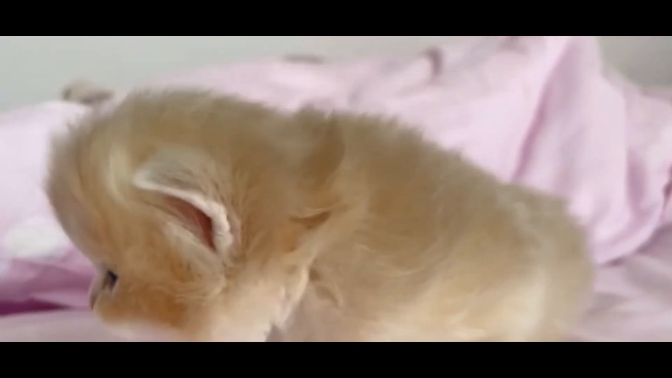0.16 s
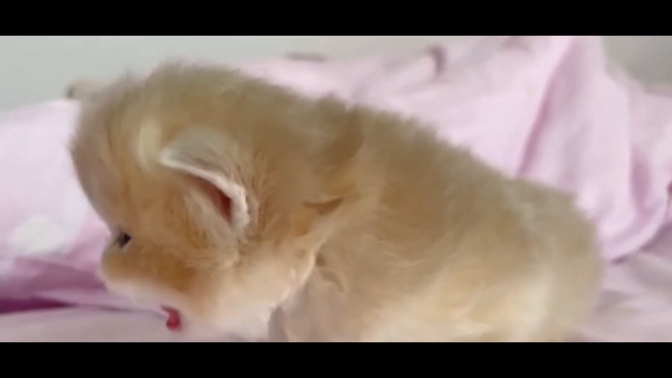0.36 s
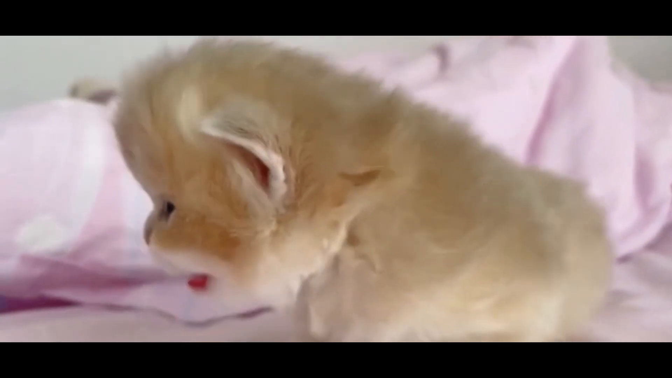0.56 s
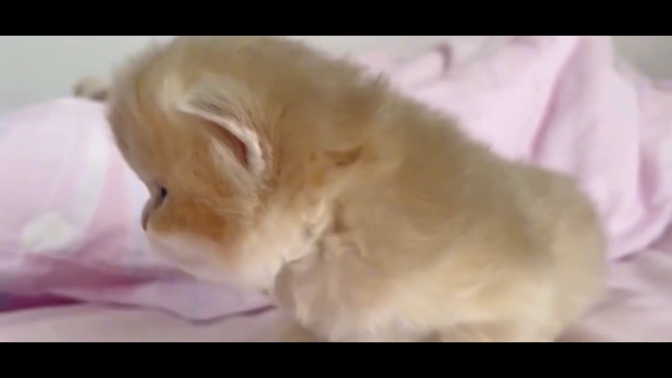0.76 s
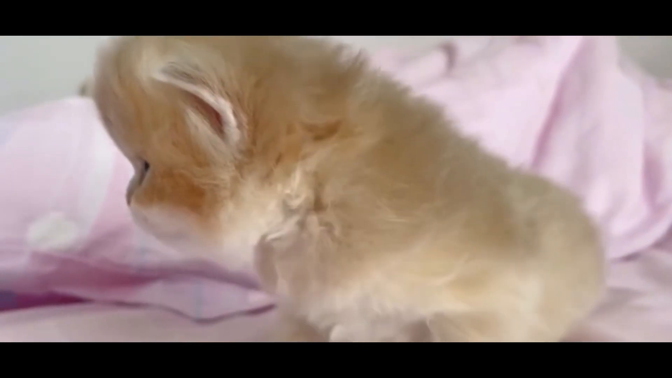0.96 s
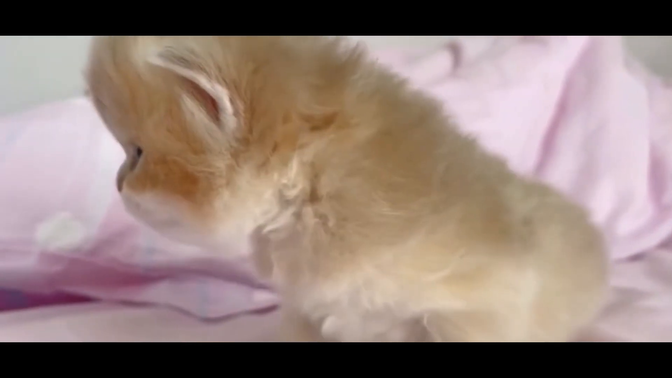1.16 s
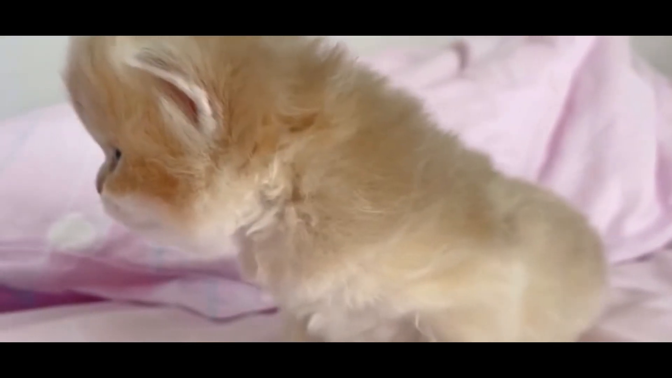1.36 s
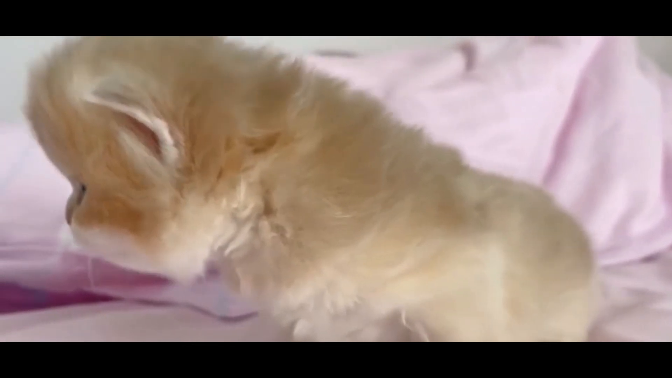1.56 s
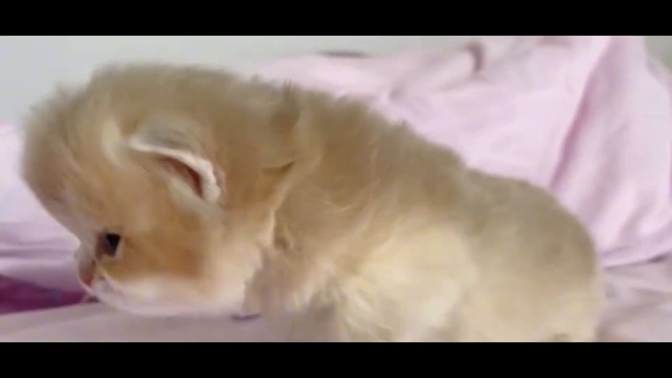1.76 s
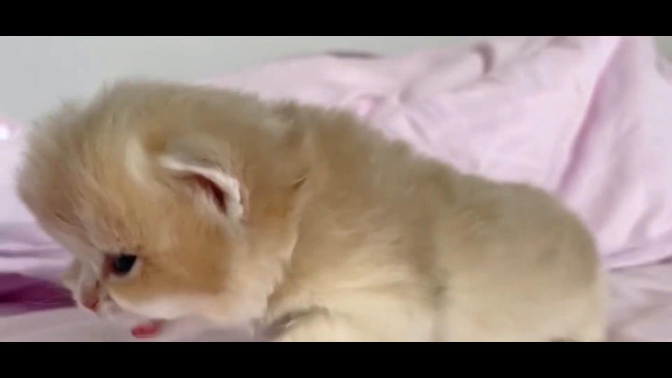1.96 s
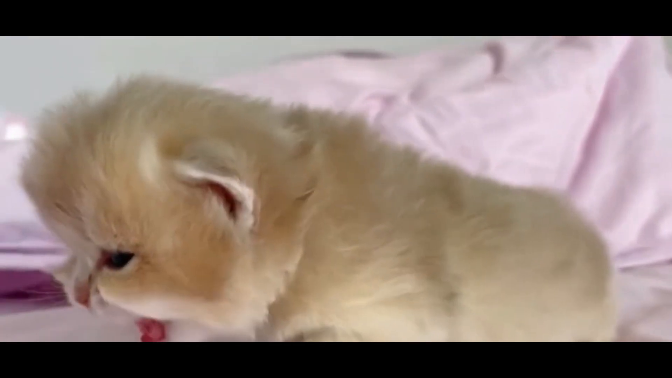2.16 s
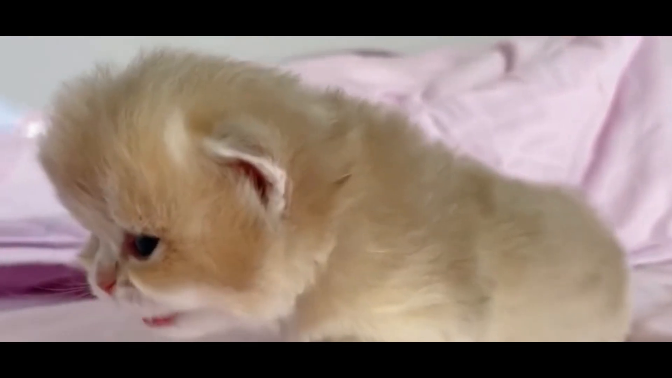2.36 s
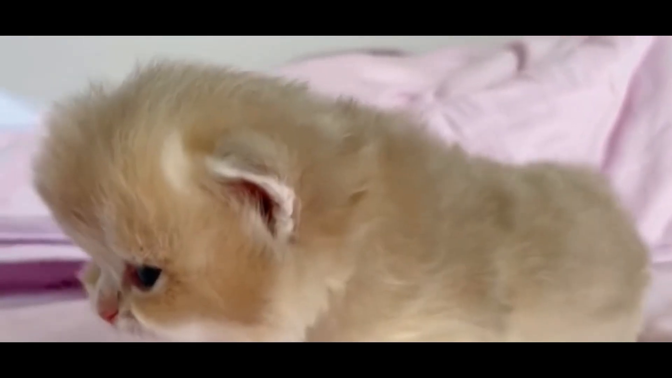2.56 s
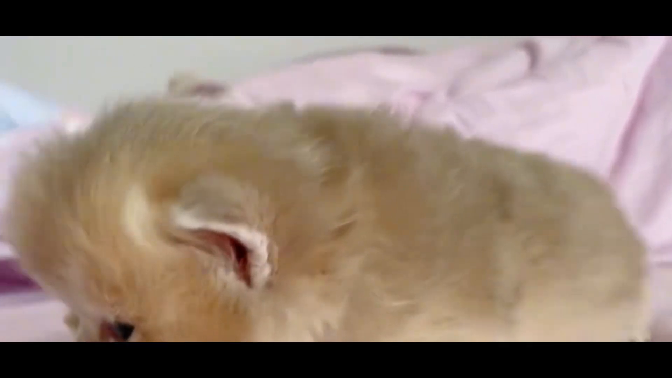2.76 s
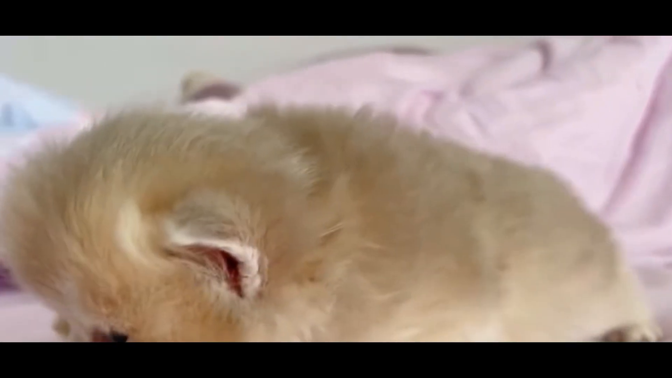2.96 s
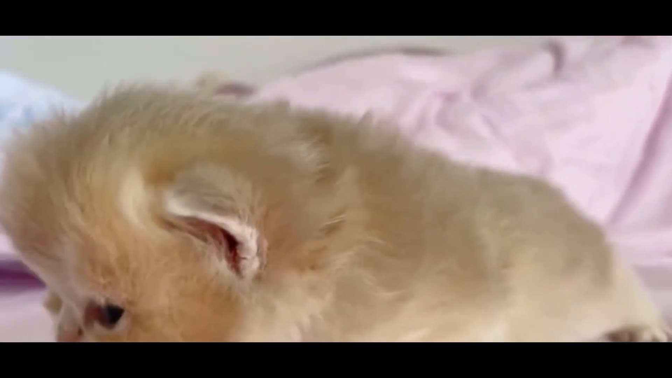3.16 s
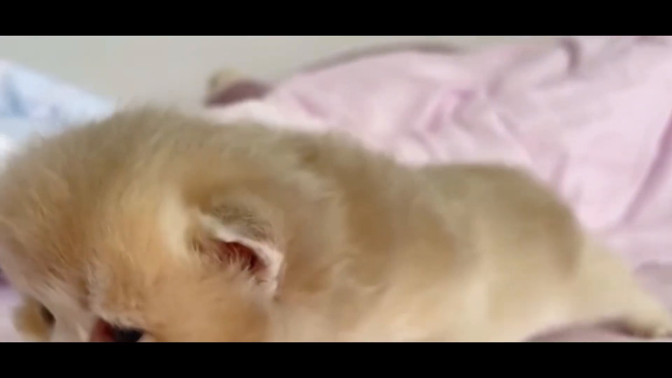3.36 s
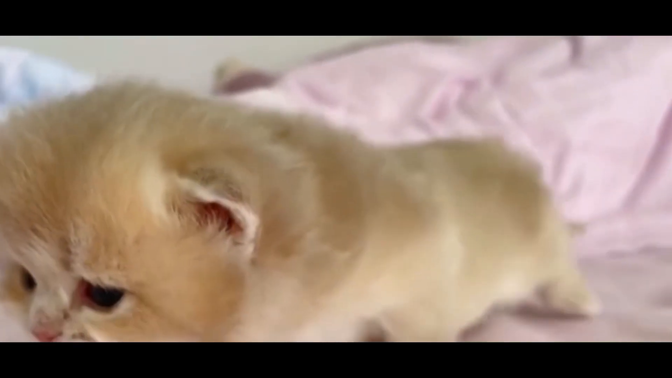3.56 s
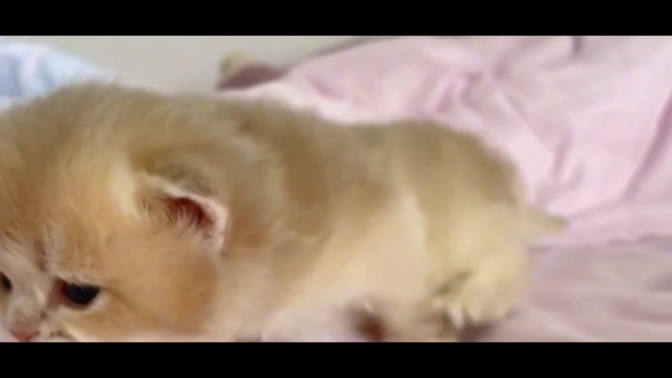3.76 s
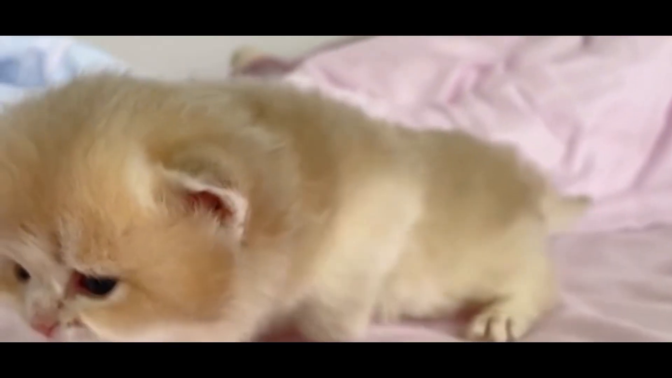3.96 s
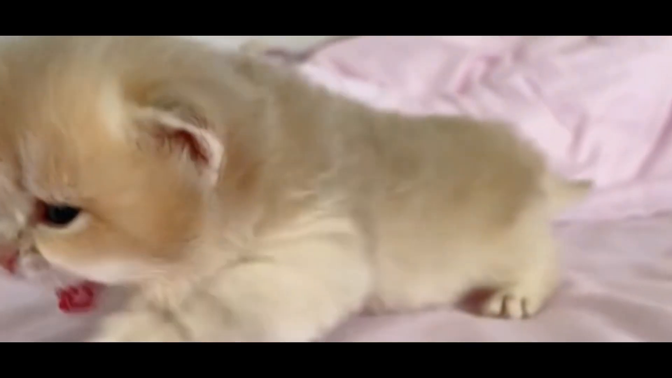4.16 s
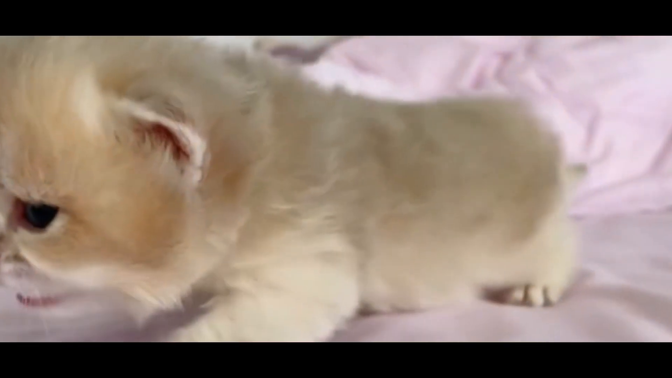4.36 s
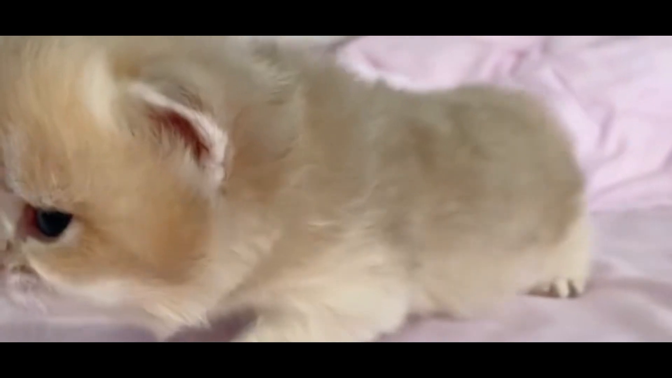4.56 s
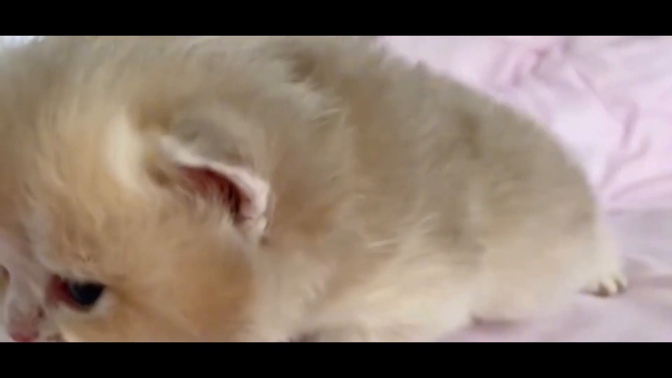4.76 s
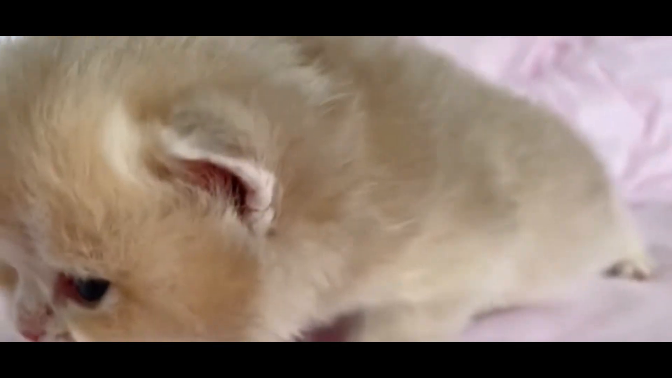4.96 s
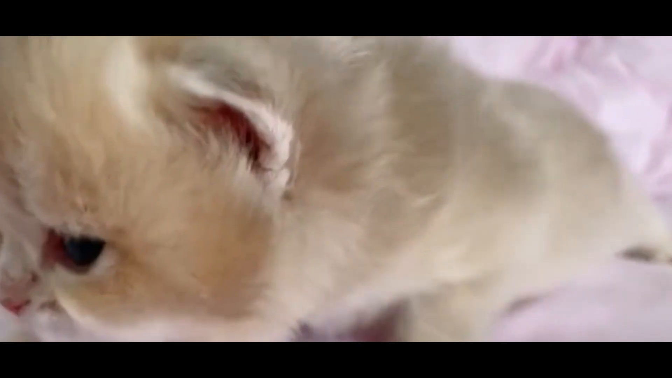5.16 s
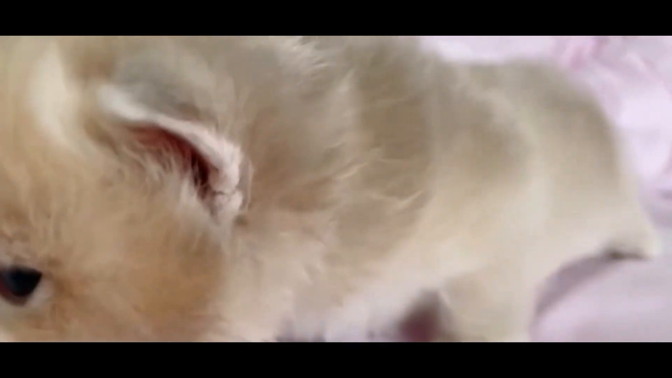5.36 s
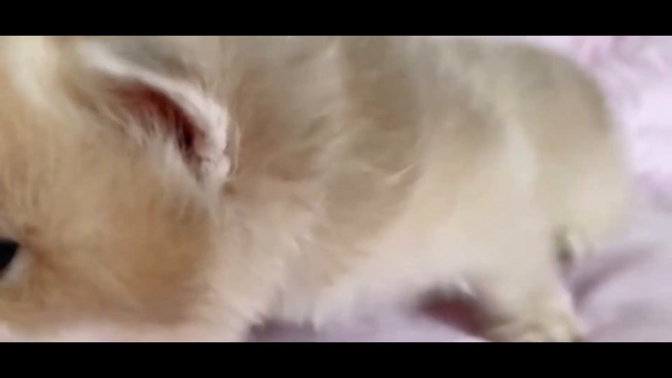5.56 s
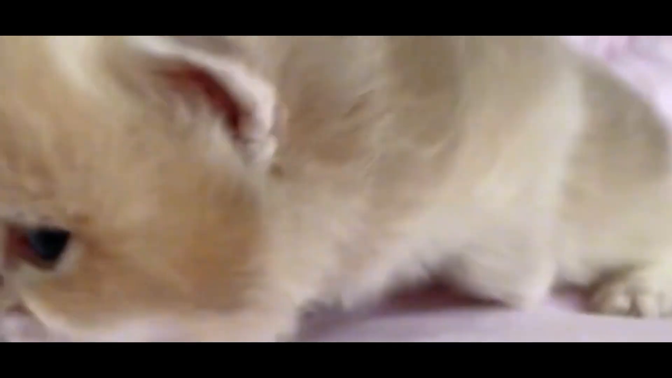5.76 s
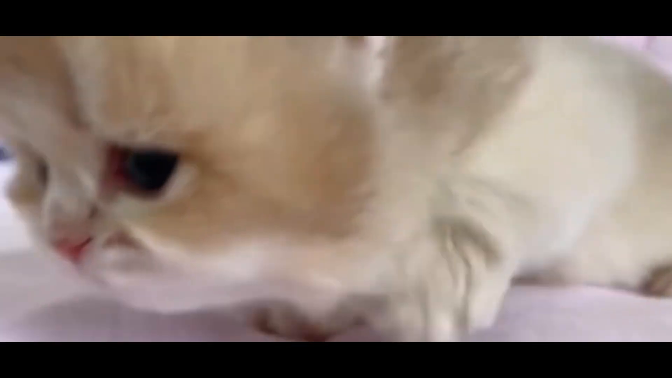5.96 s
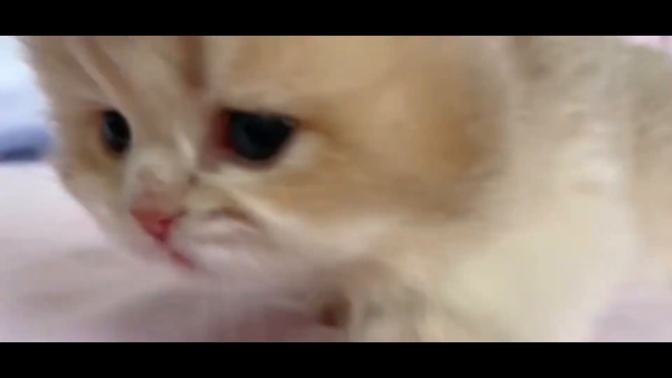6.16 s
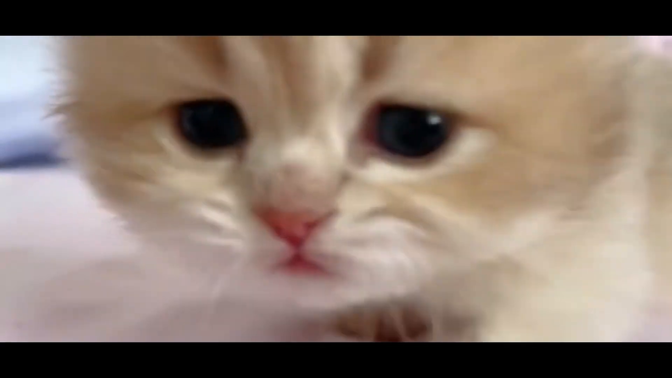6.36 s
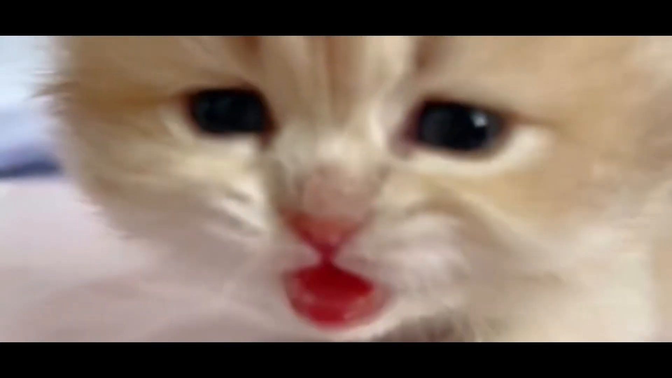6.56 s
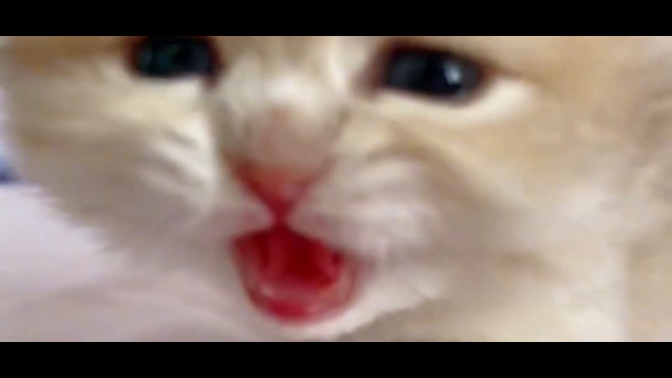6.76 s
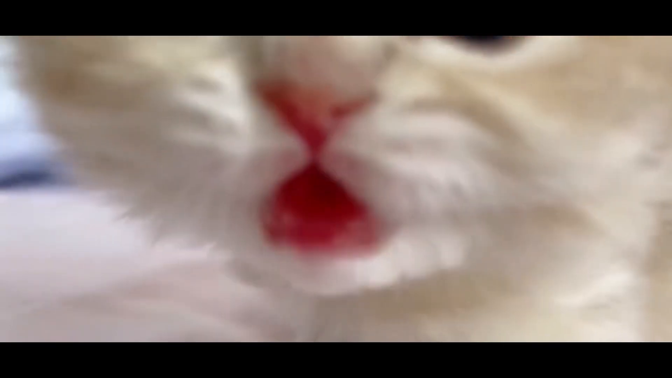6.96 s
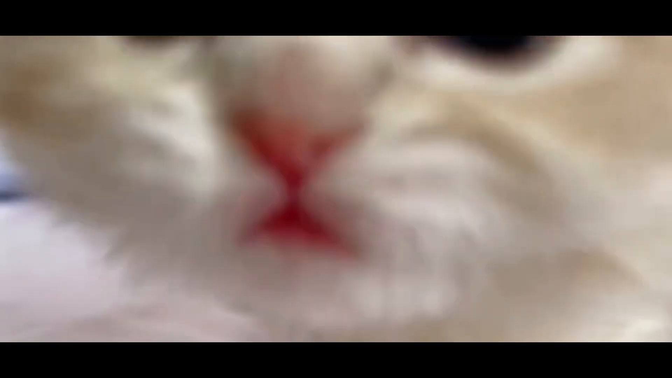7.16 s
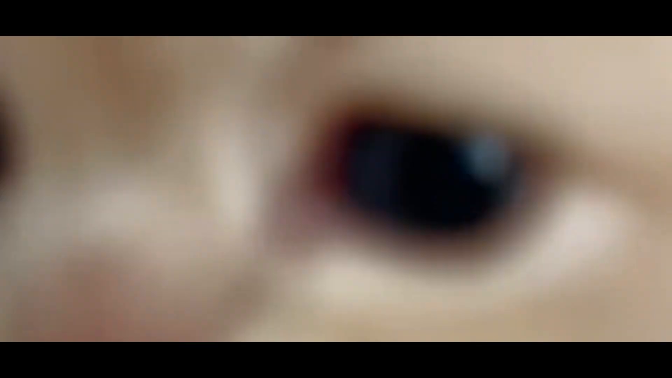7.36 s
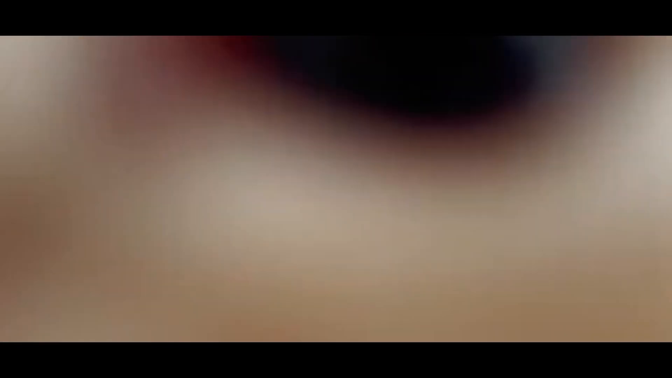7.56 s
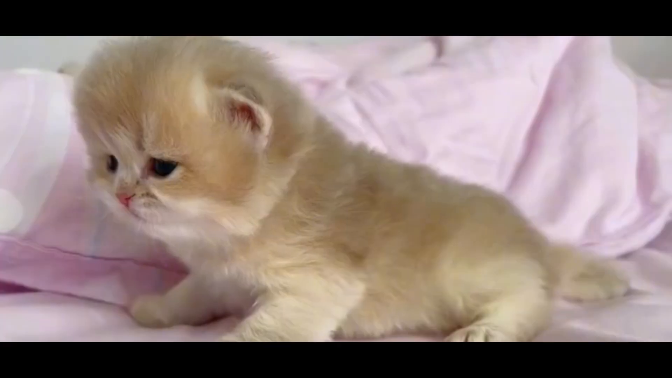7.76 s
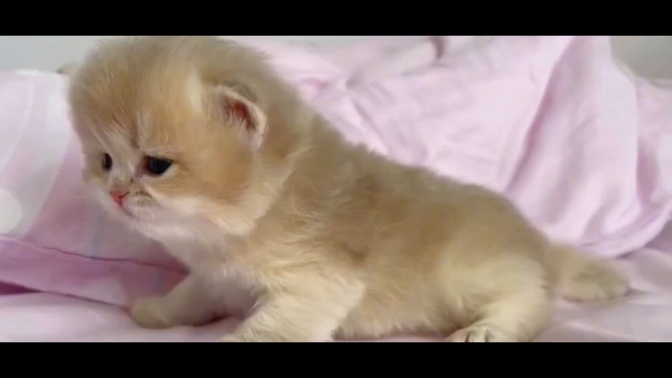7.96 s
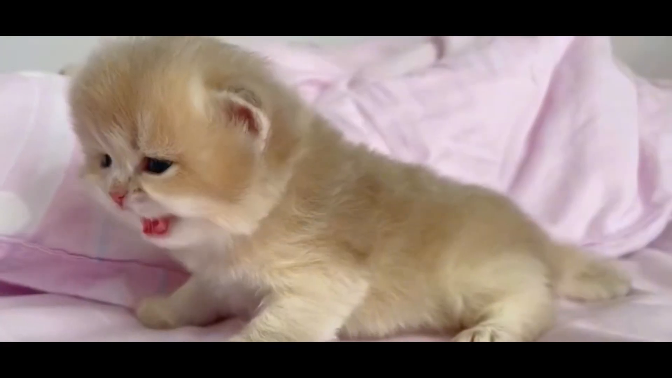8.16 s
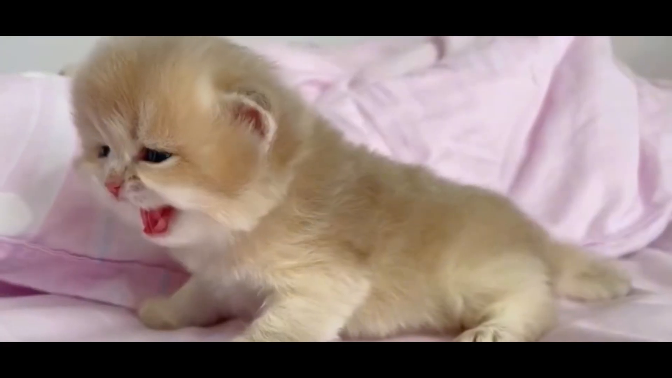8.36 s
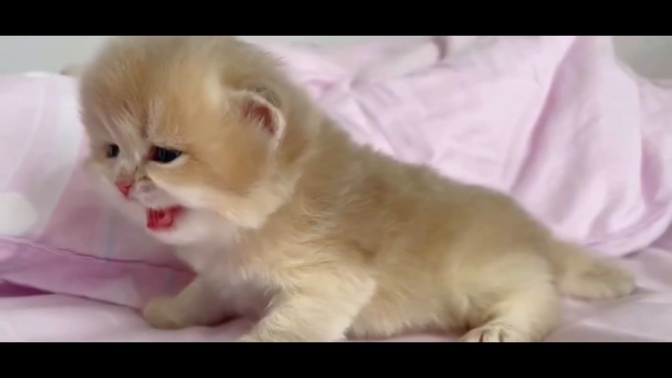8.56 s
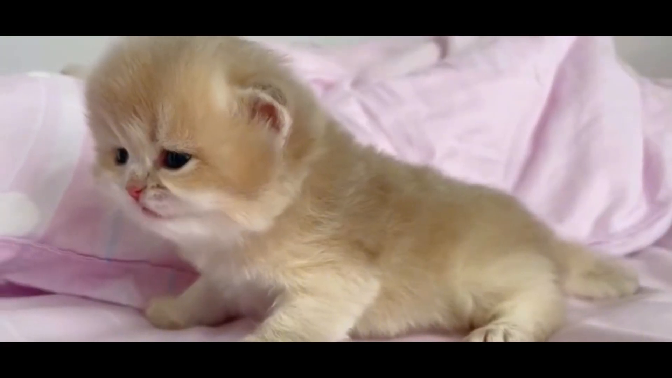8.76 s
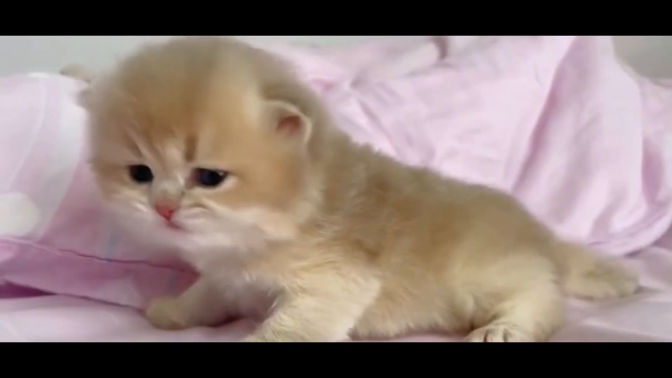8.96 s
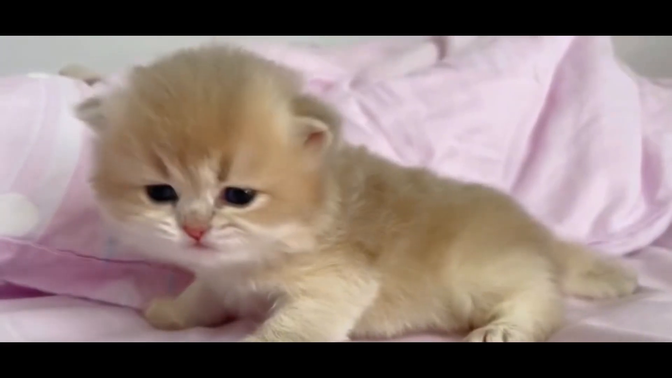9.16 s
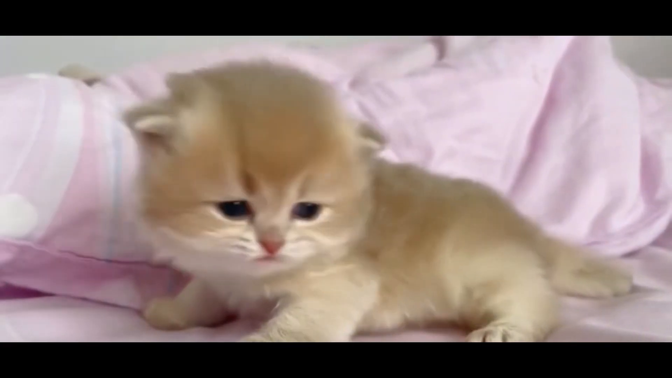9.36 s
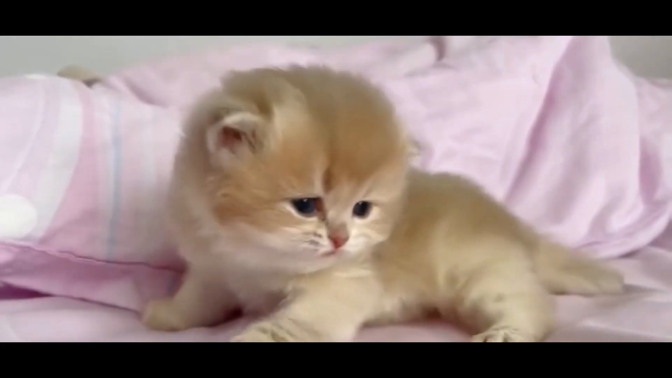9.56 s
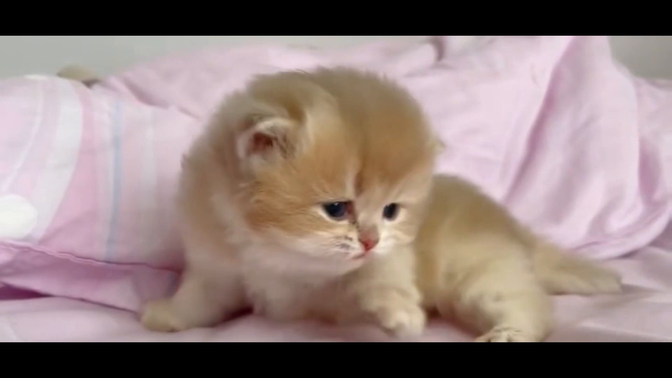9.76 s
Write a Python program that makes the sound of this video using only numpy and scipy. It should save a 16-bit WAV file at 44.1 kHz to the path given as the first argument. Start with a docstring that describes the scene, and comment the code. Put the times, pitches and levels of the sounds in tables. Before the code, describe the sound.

Quiet indoor bed, close small microphone with little deep bass. Piercing, short kitten mews rise, break and fall away, spaced about two seconds apart. Between them come soft rumble, rustle and hiss of cloth, muffled paw pats and grainy scuffs, busiest between five and six seconds. Distant littermates mew weakly early and before the fourth cry. A tiny dropout precedes the final mew, then it calms.

```python
"""A tiny kitten mews at 0, 1.8, 3.7, 6.3 and 8 s: harmonic stacks that break in pitch, with puffs of air.
Litter mates call faintly in the first 1.3 s and again from 5.5 to 6.7 s, as four shaky partials in a room.
Throughout, knocks and ticks of paws and claws, and grainy scuffs, lie over rumble, rustle and hiss of the bed.
Just after 7.5 s everything falls silent for about an eighth of a second."""
import sys
import numpy as np
from scipy import signal
from scipy.io import wavfile
from scipy.ndimage import uniform_filter1d

SR = 44100
rng = np.random.default_rng(int(sys.argv[2]) if len(sys.argv) > 2 else 0)


def unload_audio(sound):
    """Save the sound as a 16-bit wav file, at the path given as the first command line argument."""
    columns = np.transpose(np.atleast_2d(sound))
    # keep every value between -1 and 1, then stretch to whole-number steps
    steps = np.round(np.clip(columns, -1, 1) * 32767)
    wavfile.write(sys.argv[1], SR, steps.astype(np.int16))


N = 433503

# The voice through each mew, one table a mew; two close rows are a voice break.
# Each row: time in seconds, pitch in Hz, effort in dB, brightness in dB per partial.
MEWS = [
    [(0, 1396, -52.5, 3.5), (0.018, 1597, -43, 5), (0.048, 1754, -37, 2.5), (0.066, 1995, -28, -7.5),
     (0.098, 2230, -24, -7), (0.176, 2353, -12, -17), (0.264, 2173, -8, -29.5), (0.268, 2476, -17.5, -22.5),
     (0.305, 2470, -28.5, -17), (0.345, 2305, -38, -13), (0.375, 2354, -41, -23),
     (0.414, 2300, -40.5, -23.5), (0.48, 1980, -38, -26), (0.516, 1723, -34, -16), (0.52, 1207, -46, -5.5),
     (0.562, 830, -55.5, 3)],
    [(1.778, 1080, -46, -10), (1.787, 1136, -38, -6), (1.808, 1510, -43.5, 5), (1.858, 1833, -26.5, -2.5),
     (1.897, 2179, -19.5, -9.5), (1.928, 2205, -15.5, -18.5), (1.931, 2420, -10, -21.5),
     (1.973, 2347, -3.5, -27.5), (2.01, 2085, -7, -29), (2.037, 1969, -9.5, -32), (2.04, 2270, -15.5, -19),
     (2.08, 2174, -28, -20), (2.146, 2223, -35, -30), (2.296, 1764, -43.5, -38), (2.37, 1580, -37.5, -35),
     (2.388, 1528, -36, -17), (2.41, 1323, -39, -11.5), (2.454, 960, -44, -2.5)],
    [(3.733, 1117, -48.5, 0.5), (3.757, 1580, -38.5, -3), (3.768, 1780, -33, -9.5), (3.777, 1898, -22, -13),
     (3.812, 2170, -23, -8), (3.815, 1923, -23, -4.5), (3.855, 2104, -23, -8), (3.858, 2343, -19.5, -8.5),
     (3.924, 2390, -12.5, -20), (3.948, 2184, -9.5, -30.5), (3.972, 2121, -5, -25.5),
     (4.008, 2143, -19.5, -22), (4.011, 2228, -28.5, -19), (4.073, 2167, -26, -27),
     (4.115, 1972, -39.5, -43)],
    [(6.336, 1060, -46.5, 3), (6.352, 1118, -33, 1), (6.38, 1566, -35.5, 5.5), (6.41, 1750, -35.5, 6.5),
     (6.43, 1957, -24.5, -0.5), (6.47, 2218, -19, -8.5), (6.538, 2414, -2, -22.5),
     (6.59, 2154, -4.5, -28.5), (6.604, 2170, -11, -14.5), (6.607, 2314, -13.5, -20.5),
     (6.655, 2215, -23, -18), (6.68, 2274, -22.5, -24), (6.749, 2188, -27, -19.5), (6.861, 1784, -38, -25),
     (6.918, 1656, -40, -10), (6.935, 1515, -36, -6.5), (6.964, 1284, -37.5, -4.5), (6.967, 860, -41, 3),
     (6.985, 828, -39, -4)],
    [(7.977, 899, -51, -3), (8.013, 1530, -43.5, -1.5), (8.076, 1910, -31, -4), (8.104, 2113, -27.1, -9.7),
     (8.196, 2316, -15, -21.5), (8.252, 2258, -9, -26), (8.255, 2643, -17, -23), (8.351, 2462, -27, -18),
     (8.513, 2160, -40, -20.5), (8.605, 1820, -38.5, -18), (8.609, 1333, -49.5, -5),
     (8.667, 766, -60.5, 4.5)],
]
# Settings of each mew, one row a mew. Each row: mouth ring in Hz, ring strength in dB, air in dB against
# the effort, steady 7 kHz tone in dB and treble in dB, both against the third partial before the throat.
MEW_SETTINGS = [(4050, 27.5, -9.5, -38.5, -5.5), (3630, 12.5, -10, -40, -7.5), (4044, 7.5, -12.5, 3, -6),
                (4000, 1, -8, 6, 3), (3740, 9, -8.5, -40.5, -0.5)]
AIR_STEPS = 2.1  # leaking air moves this many partials' worth with brightness


def kitten():
    """Source and filter: vocal folds keep one continuous phase through the breaks; the mouth resonates."""
    t = np.arange(N) / SR
    hz, effort_db, bright_db = curves(MEWS)
    setting_starts = [rows[0][0] - .1 for rows in MEWS]
    mew_index = np.maximum(np.searchsorted(setting_starts, t) - 1, 0)
    ring_hz, ring_db, leak_db, steady_db, treble_db = np.array(MEW_SETTINGS)[mew_index].T
    turns = 2 * np.pi * np.cumsum(hz * (1 + 0.0055 * wander(100))) / SR

    dulled = np.clip((3 * hz - DULL_HZ) / 150, 0, 1)
    partials_db = low_partials_db(hz, effort_db, bright_db, ring_hz, ring_db, dulled)
    air_db = effort_db + leak_db + AIR_STEPS * bright_db
    # the stronger the air against the partials, the more ragged the tone
    rasp = np.clip(gain_of(air_db - np.max(partials_db, axis=0) - 6), .04, .35)
    # a flutter about 200 times a second
    beat = 2 * np.pi * np.cumsum(200 + 50 * wander(18)) / SR
    flutter = 1 + .04 * np.sin(beat) + rasp * wander(270)

    tone = low_partials(turns, beat, effort_db, partials_db)
    tone += upper_partials(hz, turns, effort_db + treble_db + 2 * bright_db)
    tone += dulled * gain_of(effort_db + 2 * bright_db + steady_db) * np.sin(2 * np.pi * STEADY_HZ * t)
    tone += shimmer(turns, effort_db + treble_db, bright_db)

    sounding = sum((t > rows[0][0] - .002) & (t < rows[-1][0] + .002) for rows in MEWS) > 0
    sounding = uniform_filter1d(sounding * 1., size=130)
    return (np.sqrt(2) * tone * flutter + leaking_air(hz, turns, air_db)) * sounding + puffs()


# The throat's effect on partials 1 to 3. Each row: frequency in Hz, gain in dB.
THROAT = [(750, 5), (1100, 7), (1450, 10.5), (1650, 0), (1780, -5.5), (1980, -3), (2350, -4.5),
          (3100, -2.5), (3500, -3.5), (4700, -4), (5300, -3.5), (6200, 7), (6600, 9.5), (8200, 0)]
RING_WIDTH_HZ = 220
RING_GONE_DB = 23.5  # the ring dies out as the brightness falls this far
# above DULL_HZ the third partial fades by DULL_DB, and a steady tone at STEADY_HZ sounds meanwhile
DULL_HZ, DULL_DB, STEADY_HZ = 6495, -34.5, 7063


def low_partials_db(hz, effort_db, bright_db, ring_hz, ring_db, dulled):
    """Formant filtering: each partial takes the gain of throat and mouth at its own frequency."""
    ring_db = ring_db * np.clip(1 + bright_db / RING_GONE_DB, 0, 1)
    partials_db = []
    for k in range(1, 4):
        ring = ring_db * np.exp(-((k * hz - ring_hz) / RING_WIDTH_HZ) ** 2)
        partials_db.append(effort_db + (k - 1) * bright_db + read(THROAT, k * hz) + ring)
    partials_db[2] = partials_db[2] + DULL_DB * dulled
    return partials_db


FITS_SHARE, FITS_FROM_DB = .11, -24  # strength of the side-tone fits, and the effort above which they occur


def low_partials(turns, beat, effort_db, partials_db):
    """Additive synthesis with sidebands: near the crest, side tones above the partials come in short fits."""
    near_crest = np.clip((effort_db - FITS_FROM_DB) / 10, 0, 1)
    fits = FITS_SHARE * near_crest * np.maximum(wander(30) + .3, 0)
    tone = np.zeros(N)
    for k, db in enumerate(partials_db, start=1):
        tone += gain_of(db) * np.sin(k * turns)
        tone += fits * k * gain_of(db) * np.sin(k * turns + beat)
    return tone


# Partials above the third, against it, before a further tilt of -1.5 dB per partial.
# Each row: frequency in Hz, level in dB.
OVERTONES = [(2000, 29), (4000, -7.5), (6300, -4.5), (7000, -2.5), (8000, -21.5), (9200, -39),
             (10200, -32.5), (12300, -21.5), (15500, -36)]


def upper_partials(hz, turns, third_db):
    """Harmonic series: partials 4 to 13 lock to whole multiples of the fold phase."""
    return sum(gain_of(third_db + read(OVERTONES, k * hz) - 1.5 * (k - 1.5)) * np.sin(k * turns)
               for k in range(4, 14))


# blurred lines this far above partials 1 to 3, in dB against the third before their random swing
SHIMMER_HZ, SHIMMER_DB = 5510, [-20.5, -24.5, -27]


def shimmer(turns, treble_effort_db, bright_db):
    """Frequency shift: copies of three partials, blurred by random amplitude modulation."""
    lift = 2 * np.pi * SHIMMER_HZ * np.arange(N) / SR
    base_db = np.maximum(treble_effort_db + 2 * bright_db, treble_effort_db - 31.5)
    return sum(gain_of(base_db + db) * (0.2 + wander(100)) * np.sin(k * turns + lift)
               for k, db in enumerate(SHIMMER_DB, start=1))


# Spectrum of air leaking beside the tone. Each row: frequency in Hz, relative density in dB per Hz.
LEAK = [(700, -29), (1200, -5.5), (2500, -3.5), (4000, 2), (6300, -3), (7500, -11), (9000, -28.5),
        (12000, -21), (15600, -24)]


def leaking_air(hz, turns, air_db):
    """Modulated turbulence: the folds chop leaking air, so much gathers as a haze round partials 1 to 4."""
    haze = sum(wander(500) * gain_of(read(LEAK, k * hz)) * np.sin(k * turns) for k in range(1, 5))
    return gain_of(air_db) * (.55 * noise(LEAK, patchy_db=3, flicker_db=1) + .7 * haze)


# Spectrum of a puff. Each row: frequency in Hz, relative density in dB per Hz.
PUFF_SPECTRUM = [(350, -35), (600, -28), (1270, -2.5), (2570, -12), (4430, -4.5), (7040, -25),
                 (8180, -45.5), (10300, -18.5), (15500, -46.5)]
# Puffs before the folds start, at a hard break and after they stop.
# Each row: start in seconds, length in seconds, level in dB.
PUFFS = [(0.245, 0.0089, -66.5), (2.024, 0.019, -50), (8.257, 0.02, -57.5), (0.54, 0.064, -54),
         (1.759, 0.04, -50), (2.454, 0.028, -62), (3.722, 0.019, -50), (6.313, 0.028, -56),
         (6.588, 0.043, -48), (6.953, 0.088, -40.5), (8.648, 0.059, -59.5)]


def puffs():
    """Turbulent flow without voicing: noise under brief smooth-edged envelopes."""
    envelope = np.zeros(N)
    for start, length, db in PUFFS:
        add(envelope, start, gain_of(db) * signal.windows.tukey(round(length * SR), .8))
    return envelope * noise(PUFF_SPECTRUM, patchy_db=1.5, flicker_db=1)


# Calls of the litter mates. Each row: start in seconds, length in seconds, pitch in Hz at start, middle
# and end, relative level in dB, level change over the call in dB, brightness in dB per partial,
# mouth ring in Hz, shakiness (1 = pitch off by 1.5 % rms).
MATES = [(.18, 0.23, 716, 683, 685, -70, 4.5, -12, 1370, 0.6),
         (.55, .27, 700, 740, 769, -64.5, 6.5, -15.5, 1514, 0.36),
         (.81, 0.21, 621, 646, 703, -67.5, -5.5, -4, 1830, 1.58),
         (1.0, 0.194, 694, 659, 676, -73, 2.5, -2, 2000, 0.44),
         (5.46, .18, 632.2, 667, 774.8, -67, 13.5, -2.5, 2146, 1.96),
         (5.61, 0.22, 751, 794, 746, -59.5, 1.5, -0.5, 2220, 0.3),
         (5.77, 0.1, 728, 720, 710, -57.5, -9, 3.5, 2900, 0.74),
         (5.84, 0.62, 808, 753, 643, -52, -22, -4, 2318, 0.62),
         (6.32, 0.29, 671, 658, 670, -55, -10.5, -3.5, 654, .3)]
# The mates' throat. Each row: frequency in Hz, gain in dB.
MATE_THROAT = [(500, 1), (670, -2), (790, -6.5), (1340, -2), (1550, 2), (2000, -6), (2400, 4), (2600, -17),
               (2800, -15), (3150, -9), (3600, -16)]
MATE_RING_DB, MATE_RING_WIDTH_HZ = 8.5, 400


def mates():
    """Superposition: the faint calls share one chance course of pitch and level shake."""
    far, chance = np.zeros(N), np.array([wander(120), wander(110)])
    for row in MATES:
        add(far, *mate(*row, chance))
    return far


def mate(start, length, first_hz, middle_hz, last_hz, db, fade_db, bright_db, ring_hz, shaky, chance):
    """Jitter and shimmer of a voice: a lower mew of four partials whose pitch and level shake."""
    u = np.arange(0, length, 1 / SR) / length
    # a parabola through the three pitches
    hz = first_hz * (1 - u) * (1 - 2 * u) + middle_hz * u * (1 - u) * 4 + last_hz * u * (2 * u - 1)
    pitch_shake, level_shake = shaky * chance[:, round(start * SR):][:, :len(u)]
    turns = 2 * np.pi * np.cumsum(hz * (1 + .015 * pitch_shake)) / SR
    tone = np.zeros(len(u))
    for k in range(1, 5):
        ring = MATE_RING_DB * np.exp(-((k * hz - ring_hz) / MATE_RING_WIDTH_HZ) ** 2)
        tone += gain_of(read(MATE_THROAT, k * hz) + (k - 1) * bright_db + ring) * np.sin(k * turns)
    level = gain_of(db + fade_db * u) * (1.5 + level_shake) * signal.windows.tukey(len(u), .2)
    return start, np.sqrt(2) * tone * level


# Pats of paws and claws on the cloth, each knock centred 2 ms after its time.
# Each row: time in seconds, knock level in dB, pitch in Hz, thud underneath in dB against the knock.
PATS = [(0.368, -39, 744, -13), (0.544, -40, 890, -19), (0.937, -34.5, 726, -9), (1.644, -37.5, 779, -17),
        (1.71, -42, 814, -14), (2.14, -37, 799, -3), (2.214, -43.5, 722, 1.5), (2.237, -40, 760, -2),
        (2.257, -29.5, 759, -14), (2.484, -30, 756, -6.5), (3.053, -45, 792, -8), (4.475, -48.5, 465, -5),
        (4.7, -39, 764, -10), (4.801, -41, 513, -11), (4.967, -40, 582, -13), (5.096, -40.5, 505, -4.5),
        (5.208, -34, 677, -29), (5.326, -48.5, 398, 2.5), (5.351, -35.5, 710, -4), (5.42, -39.5, 674, -11),
        (5.569, -34, 728, -6), (5.633, -34, 754, -30), (5.689, -37, 710, -3), (5.786, -17.5, 583, -18),
        (6.061, -43.5, 750, -19), (6.171, -44.5, 743, -6.5), (6.224, -25, 736, -13.5),
        (6.338, -27.5, 881, -31), (7.051, -42, 714, -12), (7.359, -47, 608, -13), (7.38, -27, 730, -20),
        (7.711, -44.5, 546, -13), (7.941, -42, 783, -17), (8.746, -47.5, 533, -15.5),
        (9.501, -44.5, 538.4, -12), (9.653, -48.5, 732, -19)]


def pats():
    """Impact sequence: every pat draws its own phases, thud pitch and rebound delay."""
    out = np.zeros(N)
    for (at, *row), luck in zip(PATS, rng.random((len(PATS), 4))):
        add(out, at - .004, pat(*row, luck))
    return out


def pat(peak_db, hz, thud_db, luck):
    """Damped impact: a dull knock, a weaker rebound, and the mattress giving way just after."""
    t = np.arange(-.006, .04, 1 / SR)

    def knock(at, width):
        """Wave packet: a cosine under a bell-shaped envelope."""
        return np.exp(-((t - at) / width) ** 2) * np.cos(2 * np.pi * (hz * (t - at) + luck[0]))

    thud_hz = 75 + 110 * luck[1]
    thud = np.exp(-((t - .011) / 0.0065) ** 2) * np.sin(2 * np.pi * (thud_hz * t + luck[2]))
    contact = knock(0, 0.0016) + 0.067 * knock(0.0012, 0.0004)
    rebound = 0.8 * knock(0.003 + 0.0013 * luck[3], 0.0014)
    return gain_of(peak_db) * (contact + rebound + gain_of(thud_db) * thud)


# Bright ticks, mostly a claw snagging the weave. Each row: time in seconds, relative level in dB.
SNAGS = [(1.7868, -33), (4.31, -30), (4.4913, -32), (4.6, -38.5), (5.2996, -46.5), (7.3797, -47.5),
         (8.0016, -29.5)]


def snags():
    """Stick and slip: each tick is a fresh burst of grit."""
    out = np.zeros(N)
    for (at, db), grit in zip(SNAGS, rng.standard_normal((len(SNAGS), 3000))):
        add(out, at, gain_of(db) * snag(grit))
    return out


def snag(grit):
    """Two-stage decay: a sharp band-passed burst of grit, then the cloth settling."""
    b, a = signal.butter(2, [900, 6000], "band", fs=SR)
    t = np.arange(len(grit)) / SR
    decay = np.exp(-t / 0.00077) + 0.083 * np.exp(-t / 0.029)
    return signal.lfilter(b, a, grit * decay)


# A limb dragged over the cloth. Each row: start in seconds, length in seconds, relative level in dB.
SCUFFS = [(3.648, 0.072, -56.5), (4.313, .05, -57.5), (4.471, 0.13, -48), (4.593, .05, -61),
          (5.29, .04, -61.5), (5.409, 0.052, -51), (5.492, 0.1, -50), (7.03, 0.049, -56),
          (7.87, 0.079, -56.5), (9.421, 0.11, -67)]
# Spectrum of a scuff. Each row: frequency in Hz, relative density in dB per Hz.
SCUFF_SPECTRUM = [(59, -42), (100, -5), (607, -2), (733, -9), (1190, -10), (1370, -13), (3610, -23),
                  (3840, -15), (15000, -47)]


def scuffs():
    """Sliding friction: noise under a quick rise and a slow fall, made grainy by fast chance level swings."""
    drag = np.zeros(N)
    for at, length, db in SCUFFS:
        u = np.arange(0, 1, 1 / (length * SR))
        add(drag, at, gain_of(db) * np.minimum(u / 0.22, 1) * (1 - u) ** 0.56)
    return drag * gain_of(3.5 * wander(90)) * noise(SCUFF_SPECTRUM, patchy_db=2.5, flicker_db=2.5)


# Weight shifting on the bed. Each row: time in seconds, rumble in dB, rustle in dB.
BED = [(0.0, -62, -64.5), (0.43, -61, -56.5), (0.8, -74, -73), (0.96, -60, -53), (1.12, -69.5, -60),
       (1.6, -72.5, -62.5), (2.15, -55.5, -55.5), (2.45, -59, -57), (3.24, -67.5, -67), (3.8, -57, -53),
       (4.31, -68.5, -69), (4.5, -58.5, -61), (5.2, -59, -66), (5.5, -53.5, -55.5), (5.85, -49.5, -48),
       (6.0, -64, -95.5), (6.22, -79, -45), (6.38, -96.5, -63), (6.62, -78.5, -76), (6.76, -66, -68),
       (7.03, -59, -56.5), (7.4, -61.5, -78.5), (7.8, -68.5, -58.5), (8.15, -60, -63), (8.6, -62.5, -61),
       (8.76, -72, -78), (9.2, -74, -89), (9.45, -68, -66.5), (9.83, -73.5, -67)]
# Fur brushing the cloth. Each row: time in seconds, hiss in dB before a 3 dB lift, fine hiss in dB.
BRUSH = [(0.62, -75, -79.5), (1.2, -75, -88.5), (1.4, -71.5, -77), (1.75, -67, -88), (3.02, -59.5, -89),
         (3.45, -66, -78), (4.5, -66.5, -76), (4.7, -69.5, -83), (5.2, -77, -86), (5.53, -64.5, -81),
         (5.75, -68, -86.5), (6.3, -74.5, -94.5), (7.04, -71.5, -72.5), (7.3, -75.5, -89.5),
         (7.95, -82, -102), (8.72, -83.5, -83.5), (9.3, -85.5, -90), (9.53, -77.5, -85),
         (9.83, -81.5, -87.5)]
# Spectra of the four noises. Each row: frequency in Hz, relative density in dB per Hz.
RUMBLE = [(30, -30), (45, -8), (70, 2), (110, -4.5), (160, -3.5), (300, -5.5), (500, -22.5)]
RUSTLE = [(200, -22), (350, -7.5), (650, -3.5), (850, -5.5), (1100, -16.5), (1500, -18.5)]
HISS = [(530, -38.5), (900, -32.5), (1010, -2), (1700, -0.5), (2380, -5.5), (3180, -9.5), (4370, -10),
        (6180, -11.5), (7860, -19.5), (9000, -40.5), (11700, -60), (19800, -120)]
FINE = [(6500, -25.5), (8500, -13.5), (9500, -0.5), (12000, -0.5), (14500, 0), (15700, -8.5)]


def bedding():
    """Broadband friction: four noises on their own levels, with small random pats in the rustle."""
    rumble, rustle, hiss, fine = gain_of(curves([BED]) + curves([BRUSH]))
    # about 60 small pats a second, of random size and sign
    size = gain_of(4.0 * np.minimum(rng.exponential(1, N), 4))
    size = size * (rng.random(N) < 60 / SR) * rng.choice([-1, 1], N)
    small = evened(signal.oaconvolve(size, pat(0, 680, 3.5, [0.077, 0.93, 0.079, 0.98]))[:N])
    out = rustle * (0.99 * noise(RUSTLE, patchy_db=4.5, flicker_db=3.5) + 0.2 * small)
    out += rumble * noise(RUMBLE, patchy_db=-1.0, flicker_db=2.5)
    out += hiss * gain_of(3) * noise(HISS, patchy_db=1, flicker_db=.8)
    out += fine * noise(FINE, patchy_db=6.0, flicker_db=0.5)
    return out


def room(x, t60):
    """Exponential reverberation: sparse taps of random sign fall 60 dB in t60 seconds."""
    taps = np.zeros(SR // 2)
    at = np.arange(100, len(taps) - 20, 20)
    taps[at + rng.integers(0, 20, len(at))] = rng.choice([-1., 1.], len(at))
    taps *= gain_of(-60 * np.arange(len(taps)) / SR / t60)
    return signal.oaconvolve(x, taps / np.linalg.norm(taps))[:N]


def noise(spectrum, patchy_db, flicker_db):
    """Short-time spectral shaping: random bins with drifting patches and a flicker shared by all."""
    frames, hz = N // 128 + 5, np.fft.rfftfreq(512, 1 / SR)
    real, imag, patches = rng.standard_normal((frames, 257, 3)).T
    patches = evened(uniform_filter1d(uniform_filter1d(patches, size=6, axis=0), size=12, axis=1))
    flicker = evened(uniform_filter1d(rng.standard_normal(frames), size=7))
    level_db = read(spectrum, hz)[:, None] + patchy_db * patches + flicker_db * flicker
    bins = (real + 1j * imag) * gain_of(level_db)
    return evened(signal.istft(bins, nperseg=512, noverlap=384)[1][:N])


def wander(top_hz):
    """Low-passed chance: random motion below top_hz, rms 1."""
    return evened(signal.sosfilt(signal.butter(4, top_hz, fs=SR, output="sos"), rng.standard_normal(N)))


def curves(tables):
    """Linear interpolation: joins tables and reads their columns at every sample."""
    s, *columns = np.vstack(tables).T
    return [np.interp(np.arange(N) / SR, s, c) for c in columns]


def read(points, hz):
    """Logarithmic frequency: interpolates dB over log Hz, with -90 dB outside the table."""
    f, value = np.transpose(points)
    return np.interp(np.log(hz + 1), np.log(f + 1), value, -90, -90)


def gain_of(db):
    """Decibel law: 20 dB is a factor of ten in amplitude."""
    return 10 ** (np.asarray(db) / 20)


def evened(x):
    """Power normalisation: scales to rms 1."""
    return x / np.sqrt(np.mean(x ** 2) + 1e-20)


def add(mix, s, sound):
    """Superposition: adds a sound into the mix from s seconds on."""
    part = mix[max(round(s * SR), 0):][:len(sound)]
    part += sound[:len(part)]


def scene():
    """Direct and reverberant field: the far calls carry more room than the near kitten."""
    near, far = kitten(), mates()
    near += gain_of(-21) * room(near, t60=.1)
    voices = near + .8 * far + gain_of(0.5) * room(far, t60=0.27)
    return (voices + bedding() + scuffs() + pats() + snags())[None]


SILENCE_START_S, SILENCE_END_S = 7.565, 7.7
EDGE_HZ = 15725  # upper band limit


def record(dry):
    """Band limiting: a small microphone loses deep bass; a brief fixed silence just after 7.5 s; the top is cut."""
    t = np.arange(N) / SR
    thin = signal.sosfilt(signal.butter(4, 42, "high", fs=SR, output="sos"), dry)
    kept = uniform_filter1d(1. * ((t < SILENCE_START_S) | (t > SILENCE_END_S)), size=300)
    low_pass = signal.firwin(511, EDGE_HZ, window=("kaiser", 9), fs=SR)
    return signal.oaconvolve(thin * kept, low_pass[None], "same")


dry = scene()
out = record(dry)
unload_audio(out)
```